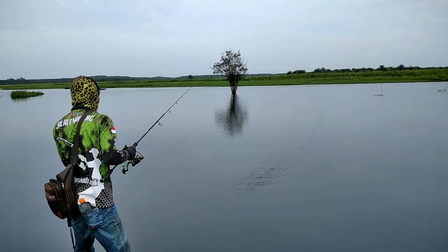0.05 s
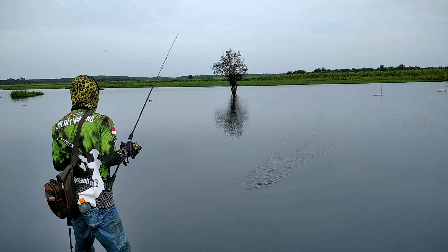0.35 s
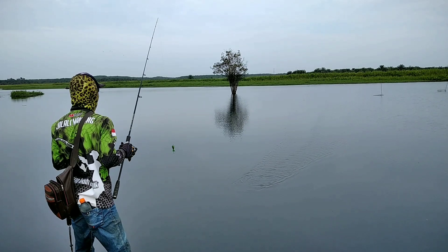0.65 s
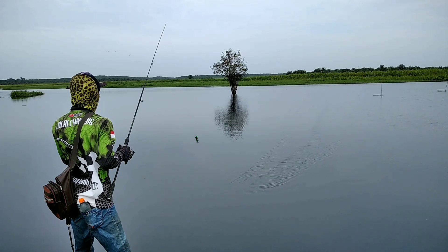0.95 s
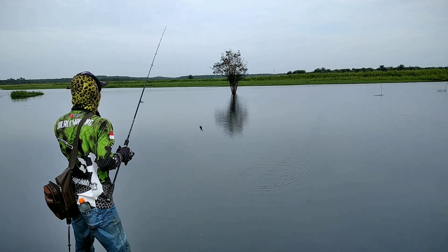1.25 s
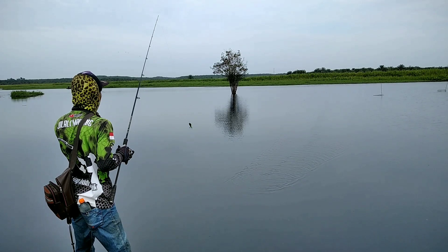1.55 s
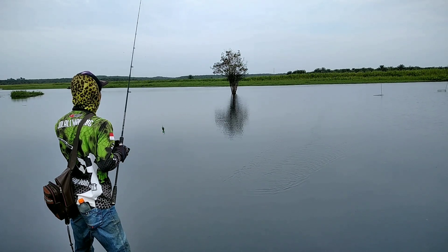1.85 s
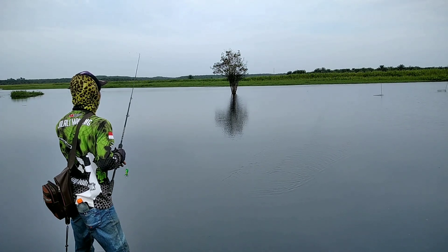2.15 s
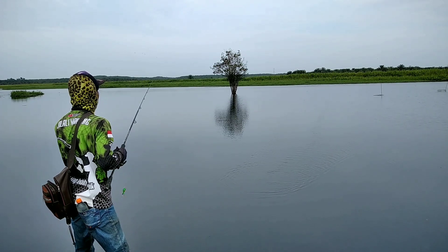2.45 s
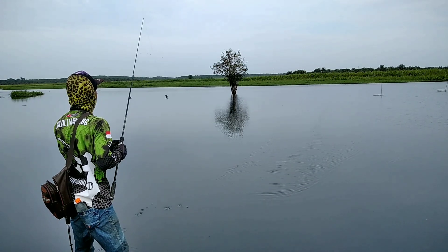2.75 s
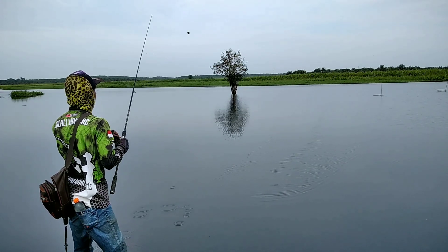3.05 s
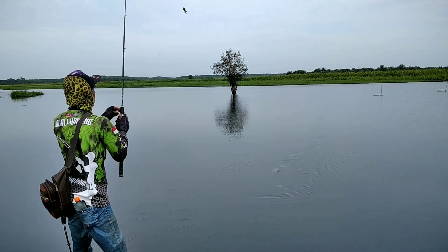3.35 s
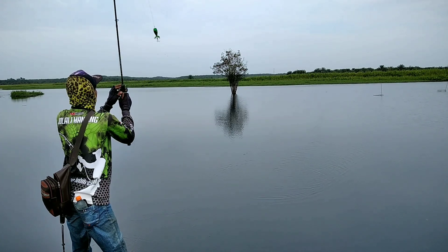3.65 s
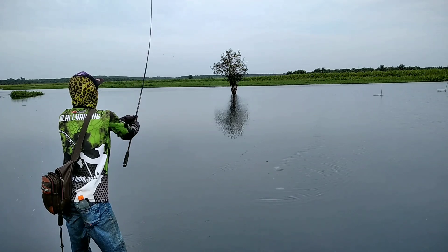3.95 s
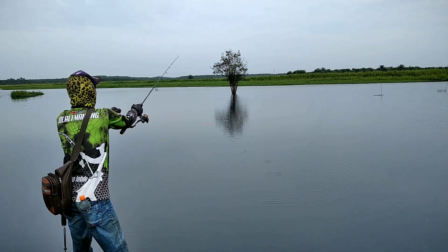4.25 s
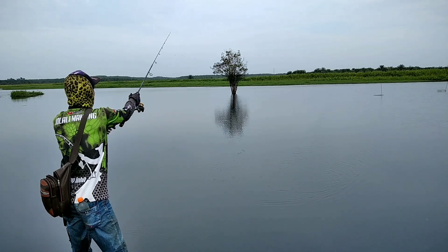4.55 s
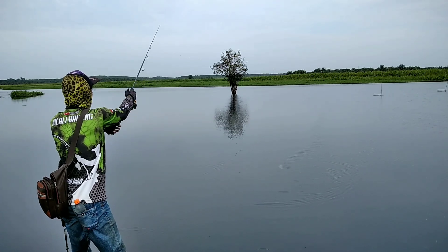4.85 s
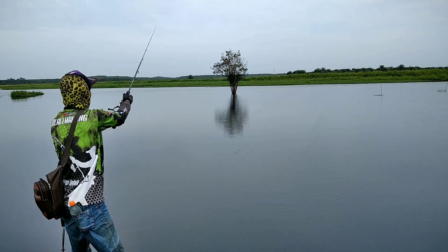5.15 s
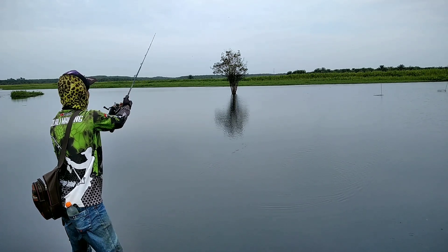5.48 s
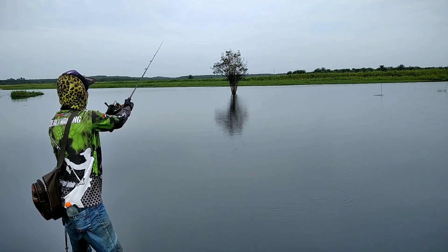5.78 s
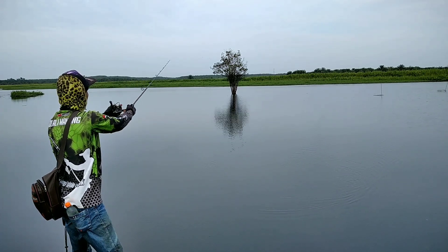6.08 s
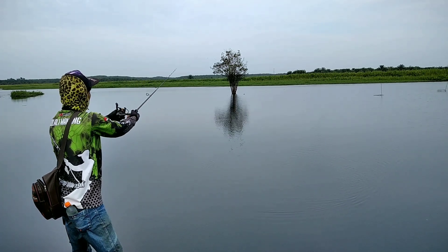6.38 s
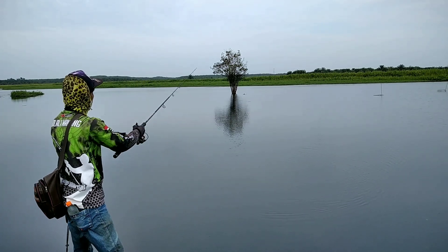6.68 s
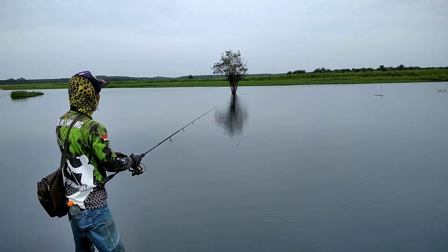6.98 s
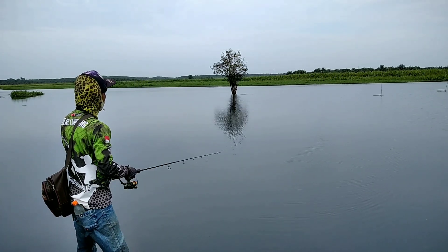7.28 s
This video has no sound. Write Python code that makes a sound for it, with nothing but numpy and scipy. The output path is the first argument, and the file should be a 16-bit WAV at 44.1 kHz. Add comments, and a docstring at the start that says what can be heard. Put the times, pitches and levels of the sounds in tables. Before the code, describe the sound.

A dense, high-pitched katydid buzz runs throughout on an open lake bank, the nearest insects to the right. Beneath it, a distant boat engine putters in a faint, low rumble on the left, swelling slightly at the end. From about 0.4 seconds a nearby frog gives short, bright rattling croaks, four or five a second, pausing around 1.5 and 5.3 seconds; a farther frog answers. A small bird chips twice at the start, and a soft, distant trill comes at 3 seconds. At 4 seconds a fishing rod swishes sharply, with a few light taps of the lure, and line hisses and rattles off the spool, fading by 5 seconds. The bird chips two falling phrases around 5 and 6 seconds. Four faint, dry reel clicks fall between 6.5 and 7 seconds. A light breeze bumps the microphones near 1 and 2 seconds and from 6 onward.

```python
"""A chorus of katydids buzzes on the bank of a still lake, each scrape ringing their wings.
Two frogs rattle to the right, pulses striking their vocal sacs. A small bird chips a few falling
phrases; a distant caller trills once. An angler casts: the rod swishes, line hisses off the spool,
the lure taps, the reel clicks. A far boat engine putters in a low rumble, mostly to the left,
and a light breeze bumps the microphones."""
import sys
import numpy as np
from scipy import signal
from scipy.fft import rfft, irfft, next_fast_len
from scipy.io import wavfile
from scipy.ndimage import map_coordinates

SR = 44100
rng = np.random.default_rng(int(sys.argv[2]) if len(sys.argv) > 2 else 0)


def store_pcm(level_fs):
    """Save levels as 16-bit WAV."""
    pcm = np.round(np.clip(level_fs, -1, 1) * 32767).astype(np.int16)
    wavfile.write(sys.argv[1], SR, np.atleast_2d(pcm).T)


N = 322812

# Swell of the katydid chorus. Each row: time in seconds, level in dB.
CHORUS_SWELL = [(0, -41), (1.8, -41.5), (3.2, -40), (5.3, -39.5), (7.32, -41.5)]
# Massed wings. Each row: frequency in Hz, relative density in dB.
WING_SPECTRUM = [(5500, -32.5), (6500, -27), (7200, -14), (7550, -15.5), (8200, -1), (8750, 6), (9100, 5),
                 (9500, -5), (9950, -12), (10300, -23), (10800, -68), (11500, -92)]
# Near katydids. Each row: stroke rate in Hz, its drift as a share, pitch in Hz, width in Hz,
# relative level in dB, L-R in dB, left lag in ms, throb rate in Hz, throb depth in dB.
NEAR_KATYDIDS = [(172.5, .004, 8050, 420, -12, -11, .311, 3, .5),
                 (176, .015, 8370, 380, -10, -13, .309, 5, 1), (115, .03, 8950, 360, -12.5, -7, .19, 7, 7),
                 (122, .045, 8780, 380, -9, -12, .307, 13, 1.2)]
# Near frog. Each row: start in seconds, pulse rate in Hz, pulse count, throat and sac in relative dB.
NEAR_FROG_CALLS = [(.4258, 96.7, 10, -64, -52.5), (.647, 97, 11, -59, -50), (.88, 91, 9, -59.5, -60),
                   (1.0671, 93.4, 10, -57.5, -47.3), (1.2746, 94.8, 10, -58, -47.3),
                   (2.16, 91, 8, -62, -66), (2.3527, 93.9, 11, -59.5, -46.5), (2.5839, 96.1, 8, -58.5, -46),
                   (2.7735, 95.6, 9, -63, -47), (3.005, 90, 9, -59.5, -62), (3.1797, 94.8, 10, -60, -45.3),
                   (3.3929, 95.6, 9, -58, -45.3), (3.602, 91, 9, -58, -60), (3.8131, 94.7, 10, -57, -45.7),
                   (4.03, 95, 10, -59, -53), (4.2522, 94.6, 10, -60, -43.7),
                   (4.4691, 94.8, 9, -56.5, -45.5), (4.675, 91, 9, -59.5, -61),
                   (4.8364, 95.7, 10, -57, -44.3), (5.085, 91, 8, -60, -61), (5.865, 91, 8, -60, -61),
                   (6.0245, 95.5, 11, -57.5, -45), (6.2361, 95.9, 10, -58.5, -44.7),
                   (6.4355, 95, 9, -59, -44.5), (6.655, 91, 9, -59.5, -62), (6.8179, 95, 10, -56.5, -44.5),
                   (7.0273, 94.9, 9, -58.5, -45.3), (7.25, 91, 9, -59, -62)]
# Far frog. Each row: start in seconds, relative level in dB.
FAR_FROG_CALLS = [(0.599, -66), (0.84, -59.5), (2.148, -63.5), (2.649, -65), (2.991, -60), (3.571, -60),
                  (4.67, -58.5), (4.89, -61), (5.071, -57.5), (5.631, -65.5), (5.85, -56.5), (6.079, -58.5),
                  (6.279, -60), (6.66, -58), (6.901, -60), (7.24, -58.5)]
# Vocal sac. Each row: ratio to sac pitch, gain in dB, rise in seconds, peak after the pulse in seconds.
SAC_MODES = [(.61, -20, .0009, 0), (.85, -20, .0016, -.001), (.995, -1.5, .0019, -.0002),
             (1.24, -22, .002, .0005), (1.495, -10.8, .0008, .0002)]
# Double knock of the throat. Columns as in SAC_MODES.
THROAT_MODES = [(.455, -1.8, .0018, -.0035), (.468, -1.2, .0018, -.0015)]
# Scatter from grass and shore. Each row: frequency in Hz, t60 in seconds.
BANK_DECAY = [(500, 0.11), (1300, 0.1), (3000, 0.089), (9000, 0.028)]
# Strength of the bank's return. Each row: frequency in Hz, gain in dB.
BANK_RESPONSE = [(900, -11), (1350, 1), (2000, 18), (2800, 0.5), (3600, -3), (4400, 13), (6000, -12)]
# Bird notes. Each row: start and length in seconds, top pitch in Hz, its place from 0 to 1, level in dB.
BIRD_NOTES = [(0.053, .037, 3940, .4, -55), (0.162, .035, 3720, 0.55, -57), (3.968, .02, 4800, .5, -56),
              (5.061, .044, 4880, .5, -51.5), (5.152, .044, 4760, .5, -51.5), (5.255, .035, 4350, .5, -55),
              (5.811, .03, 6080, 1, -52), (5.911, .022, 6150, 1, -53), (6.003, .025, 5430, .5, -53),
              (6.098, .022, 5200, .55, -58)]
# Rod swish, line hiss, line slapping and rattling in the rod rings, reel click.
# Each row: frequency in Hz, relative density in dB.
SWISH_SPECTRUM = [(150, -41), (350, -6), (900, 2.5), (2200, 2), (3900, 1), (4700, -1), (5400, -5.5),
                  (8000, -2.5), (14000, -27)]
LINE_SPECTRUM = [(800, -13.5), (3000, -21), (6000, -19), (8500, -10), (10500, 3), (14300, -1.5)]
SLAP_SPECTRUM = [(1200, -16), (3300, -1.5), (6000, -1.5), (12000, -11)]
RATTLE_SPECTRUM = [(500, -19), (1400, -12), (2800, -6), (3500, 0), (4600, 1), (5500, -10), (6600, -6),
                   (8000, 3), (14000, -4.5)]
CLICK_SPECTRUM = [(600, -8), (1500, -2), (3800, 2), (6000, -7), (13000, -35)]
# Lure and line on the rod. Each row: start in seconds, pitch in Hz, relative level in dB, t60 in seconds.
ROD_TAPS = [(.857, 507, -40.5, 0.033), (2.459, 900, -44, .025), (3.999, 2100, -34, .014),
            (4.046, 628, -33, 0.037), (4.055, 385, -33, 0.037), (4.117, 790, -29.5, 0.025),
            (4.358, 810, -37, 0.024)]
# Reel clicks. Each row: start in seconds, level in dB.
REEL_CLICKS = [(6.576, -52.5), (6.765, -52), (6.783, -54), (6.982, -55)]
# Boat engine. Each row: time in seconds, firing rate in Hz, relative level in dB.
ENGINE_RUN = [(0, 20.75, -58.5), (2.4, 20.7, -58), (5, 20.7, -61.5), (7.32, 21.8, -53)]
# Engine hum. Each row: frequency in Hz, relative harmonic level in dB.
HUM_SPECTRUM = [(41, -22), (83, 0), (125, -9), (207, -1), (250, -9), (415, -10), (500, -9), (580, -20)]
# Air bumps on the microphones. Each row: peak time in seconds, level in dB, L-R in dB.
AIR_BUMPS = [(0.862, -55, 2), (2.1, -50, -9), (2.222, -51.5, -16.5), (6.12, -54, 11)]
# Exhaust, air bump, far rumble, dull rush, open air. Each row: frequency in Hz, relative density in dB.
EXHAUST_SPECTRUM = [(35, -38), (60, 9.5), (85, 8.5), (130, -0.5), (200, 2.5), (300, 5), (345, -6.5),
                    (450, -15.5), (800, -25), (1500, -69.5)]
BUMP_SPECTRUM = [(30, -35.5), (60, -4.5), (85, -2), (140, -5), (250, -23.5), (600, -40), (1200, -76)]
RUMBLE_SPECTRUM = [(13, -68), (22, -50), (56, -4), (80, 4), (289, -8), (349, -14), (700, -33), (910, -39.5),
                   (1540, -120)]
WASH_SPECTRUM = [(200, -14.5), (330, -3), (450, -0.5), (650, -7), (900, -8.5), (1400, -48)]
AIR_SPECTRUM = [(200, -17.5), (500, 9.5), (1000, 5.5), (2000, 4.5), (4500, 1.5), (5500, -12),
                (10500, -42.5), (11800, -26), (13600, 3), (14400, -15)]


def katydids(mass_db=1.03, near_db=2.0, flutter_db=1.0):
    """Far singers merge into one band; each near one rings its wings once a stroke."""
    level_db, = curves(CHORUS_SWELL)
    out = amp(mass_db + flutter_db * wobble(16)) * rush(WING_SPECTRUM, alike=.066) * pan(-.27)
    for stroke_hz, drift, pitch_hz, width_hz, db, pan_db, lag_ms, throb_hz, depth_db in NEAR_KATYDIDS:
        scrape = np.exp(np.cos(cycles(stroke_hz, drift))) * rng.standard_normal(N)
        ring = filtered(scrape, lambda hz: 1 / (1 + 1j * (hz - pitch_hz) / width_hz) ** 4)
        throb_db = depth_db * np.cos(cycles(throb_hz, drift=.056)) + .17 * wobble(.41)
        song = unit(ring * amp(throb_db))
        out += amp(near_db + db) * placed(song, lag_ms, pan_db)
    return amp(level_db) * out


def croaks(calls, modes, sac_hz, jitter, cold_flat=.085, warm_up_s=1.1, attack_s=.02, sag_db_per_s=60):
    """Pulse trains strike the modes. The frog starts its bout flat and warms up to pitch."""
    out, t = np.zeros(N), np.arange(SR // 100) / SR
    for start_s, pulse_hz, pulses, db in calls:
        call_hz = sac_hz * (1 - cold_flat * np.exp(-start_s / warm_up_s))
        for offset_s in np.arange(pulses) / pulse_hz:
            onset = 1 - np.exp(-(offset_s + 1 / pulse_hz) / attack_s)
            force = onset * amp(db - sag_db_per_s * offset_s + rng.normal(0, 1))
            pitch_hz = call_hz * (1 + jitter * rng.standard_normal())
            pulse_s = start_s + offset_s + rng.normal(0, .0002)
            for ratio, mode_db, rise_s, peak_s in modes:
                shape = (t / rise_s * np.exp(1 - t / rise_s)) ** 3
                ring = shape * np.sin(2 * np.pi * (ratio * pitch_hz * t + rng.random()))
                add(out, pulse_s + peak_s - rise_s, force * amp(mode_db) * ring)
    return out


def frogs(near_db=13.4, far_db=13.5, near_wet_db=-12, far_wet_db=-5, far_pulse_hz=93, far_pulses=10):
    """The near frog's low throat knocks lead its bright sac by a pulse. A far, wetter frog answers."""
    throat_calls = [(s - 1 / hz, hz, pulses + 1, db) for s, hz, pulses, db, _ in NEAR_FROG_CALLS]
    sac_calls = [(s, hz, pulses, db) for s, hz, pulses, _, db in NEAR_FROG_CALLS]
    far_calls = [(s, far_pulse_hz, far_pulses, db) for s, db in FAR_FROG_CALLS]
    throat = croaks(throat_calls, THROAT_MODES, sac_hz=2835, jitter=.02)
    sac = croaks(sac_calls, SAC_MODES, sac_hz=2835, jitter=.01)
    near = amp(near_db) * (throat + sac)
    far = amp(far_db) * croaks(far_calls, SAC_MODES, sac_hz=2850, jitter=.022)
    direct = placed(near, lag_ms=.482, pan_db=-1.2) + placed(far, lag_ms=.41, pan_db=-1.2)
    tail = bank_scatter(amp(near_wet_db) * near + amp(far_wet_db) * far)
    return direct + filtered(tail, lambda hz: amp(along(BANK_RESPONSE, hz)))


def bird(arch=180, rasp_db=3, rasp_share=.013, wet_db=-10):
    """Short, raspy chips arch up and over in pitch; the highest break off at the top."""
    out, flutter, waver = np.zeros(N), wobble(600), wobble(700)
    for start_s, length_s, top_hz, crest, db in BIRD_NOTES:
        t = np.arange(round(length_s * SR)) / SR
        span = round(start_s * SR) + np.arange(len(t))
        pitch_hz = top_hz * (1 - arch * abs(t - crest * length_s) ** 1.8 + rasp_share * waver[span])
        gain = amp(db + rasp_db * flutter[span]) * np.sin(np.pi * t / length_s) ** .5
        add(out, start_s, gain * np.sin(2 * np.pi * np.cumsum(pitch_hz) / SR))
    return placed(out, lag_ms=.404, pan_db=-4) + amp(wet_db) * bank_scatter(out)


def trill(start_s=3.052, pips=5, rate_hz=27, pip_s=.02, pitch_hz=2400, db=-54, wet_db=-10):
    """A distant caller gives one run of soft, even pips."""
    out, t = np.zeros(N), np.arange(round(pip_s * SR)) / SR
    pip = amp(db) * np.sin(np.pi * t / pip_s) * np.sin(2 * np.pi * pitch_hz * t)
    for k in range(pips):
        add(out, start_s + k / rate_hz, pip)
    return placed(out, lag_ms=.22, pan_db=0) + amp(wet_db) * bank_scatter(out)


def rod_swish(swing_s=4.052, whip_s=4.118, swing_db=-36, whip_db=-40, wake_db=-47):
    """The rod cuts the air on the swing and the whip back; the lure trails a fading rush."""
    swing = amp(swing_db) * envelope(swing_s, attack_s=.027, release_s=.042, hold_s=.004)
    whip = amp(whip_db) * envelope(whip_s, attack_s=.022, release_s=.026, hold_s=.008)
    wake = amp(wake_db) * envelope(whip_s, attack_s=.037, release_s=.22, hold_s=.12, sag_db_per_s=17)
    gain = np.sqrt(swing ** 2 + whip ** 2 + wake ** 2)
    return gain * amp(1.66 * wobble(90)) * rush(SWISH_SPECTRUM, alike=.11)


def fishing_line(start_s=4.05, flight_s=.96, braking=2.3, coil_hz=100, slowing_s=4.7,
                 hiss_db=-42, slap_db=-40, rattle_db=-47.5):
    """Coils burst off the spool, slap the rod rings and rattle through, easing as the lure slows."""
    flown_s = np.maximum(np.arange(N) / SR - start_s, 0)
    speed = np.maximum(1 - (flown_s / flight_s) ** braking, 0)
    flight = speed * envelope(start_s, attack_s=.03, release_s=.05, hold_s=flight_s, sag_db_per_s=4)
    burst = amp(-1) * envelope(peak_s=4.07, attack_s=.03, release_s=.022)
    slap_gain = amp(slap_db) * envelope(peak_s=4.092, attack_s=.035, release_s=.04)
    slap = slap_gain * rush(SLAP_SPECTRUM, alike=.1) * pan(-4)
    coil = np.cos(cycles(coil_hz * np.exp(-flown_s / slowing_s), drift=.023))
    flutter = unit(amp(.5 * coil + 1.1 * wobble(28) + 1.2 * wobble(250)))
    hiss = amp(hiss_db) * flutter * rush(LINE_SPECTRUM, alike=0) * pan(5)
    rasp = unit(amp(2.5 * coil + 1.5 * wobble(70) + 3.5 * wobble(400)))
    rattle = flight * amp(rattle_db) * rush(RATTLE_SPECTRUM, alike=.1)
    return (flight + burst) * hiss + rasp * (slap + rattle)


def rod_taps(attack_s=.0016):
    """Lure and line tap the rod; each tap rings briefly at one pitch."""
    out, t = np.zeros(N), np.arange(SR // 8) / SR
    for start_s, hz, db, t60_s in ROD_TAPS:
        gain = amp(db - 60 * t / t60_s) * (1 - np.exp(-t / attack_s))
        add(out, start_s, gain * np.sin(2 * np.pi * hz * t))
    return out * pan(4)


def reel(t60_s=.025):
    """The angler works the reel: short, dry clicks."""
    strikes, t = np.zeros(N), np.arange(SR // 10) / SR
    for start_s, db in REEL_CLICKS:
        add(strikes, start_s, amp(db - 60 * t / t60_s))
    return strikes * rush(CLICK_SPECTRUM, alike=0) * pan(-3)


def boat(exhaust_gain_db=-1, hum_db=-61.5, fade_db_per_s=1.2, harmonics=14):
    """A far one-cylinder engine: a dull, smeared puff per firing, over a receding even-harmonic hum."""
    firing_hz, level_db = curves(ENGINE_RUN)
    phase = cycles(firing_hz, drift=.00295)
    puffs = np.exp(1.57 * np.cos(phase)) * rush([(100, 0)], alike=.43)  # white noise, pulsed
    dull_puffs = unit(filtered(puffs, lambda hz: amp(along(EXHAUST_SPECTRUM, hz))))
    exhaust = amp(level_db + exhaust_gain_db) * dull_puffs
    tones = np.zeros(N)
    for order in range(2, 2 * harmonics + 1, 2):
        tone_db = along(HUM_SPECTRUM, order * firing_hz[0]) + 1.8 * wobble(2.3)
        tones += amp(tone_db) * np.sin(order * phase + 2 * np.pi * rng.random())
    hum = amp(hum_db - fade_db_per_s * np.arange(N) / SR) * unit(tones)
    return (exhaust + hum) * pan(13.5)


def breeze(half_bump_s=.045, arrival_s=6.02, rise_s=.23, steady_db=-58, lumpy_db=3):
    """Air bumps the microphones a few times, then keeps nudging mainly the left one."""
    t = np.arange(N) / SR
    bumps = sum(amp(db) * np.exp(-((t - peak_s) / half_bump_s) ** 2) * pan(pan_db)
                for peak_s, db, pan_db in AIR_BUMPS)
    onset = np.exp(np.minimum(t - arrival_s, 0) / rise_s)
    steady = amp(steady_db + lumpy_db * wobble(11)) * onset * pan(9.4)
    return (bumps + steady) * rush(BUMP_SPECTRUM, alike=.27)


def background(rumble_db=-53.5, swell_share=.099, wash_db=-60.5, fade_db_per_s=1.23, air_db=-57):
    """Far rumble on the left that swells with the boat, a fading dull rush, and open-country hiss."""
    _, engine_db = curves(ENGINE_RUN)
    swell_db = swell_share * (engine_db - engine_db.mean()) + .54 * wobble(15)
    rumble = amp(rumble_db + swell_db) * rush(RUMBLE_SPECTRUM, alike=.55) * pan(12.45)
    wash = amp(wash_db - fade_db_per_s * np.arange(N) / SR) * rush(WASH_SPECTRUM, alike=.36) * pan(1.7)
    return rumble + wash + amp(air_db) * rush(AIR_SPECTRUM, alike=-.073)


def bank_scatter(x, delay_s=.004):
    """Grass and shore return a short diffuse tail, new for each side and each quarter second."""
    out, block = np.zeros((2, N)), SR // 4
    for start in range(0, N, block):
        hz, t, noise = signal.stft(rng.standard_normal((2, block)), SR, nperseg=256)
        decay = amp(-60 * t / along(BANK_DECAY, hz)[:, None])
        _, tails = signal.istft(noise * decay, SR, nperseg=256)
        for side, tail in zip(out, tails):
            echo = signal.fftconvolve(x[start:start + block], tail / np.linalg.norm(tail))
            add(side, start / SR + delay_s, echo)
    return out


def amp(db):
    return 10 ** (np.asarray(db) / 20)


def unit(x):
    """Scale to rms 1."""
    return x / np.sqrt(np.mean(x ** 2) + 1e-20)


def along(points, hz):
    """Interpolate (Hz, value) points on a log axis."""
    knots_hz, values = np.transpose(points)
    return np.interp(np.log(hz + 1), np.log(knots_hz + 1), values)


def curves(rows):
    """One value per sample for each column after the time."""
    times_s, *columns = np.transpose(rows)
    return [np.interp(np.arange(N) / SR, times_s, column) for column in columns]


def wobble(rate_hz):
    """A smooth random curve with knots at rate_hz."""
    knots = rng.standard_normal(int(N * rate_hz / SR) + 4)
    return map_coordinates(knots, [np.arange(N) * rate_hz / SR])


def cycles(rate_hz, drift):
    """Phase in radians of a rhythm whose rate drifts by a share."""
    return 2 * np.pi * (rng.random() + np.cumsum(rate_hz * (1 + drift * wobble(3))) / SR)


def envelope(peak_s, attack_s, release_s, hold_s=0, sag_db_per_s=0):
    """Rise to 1, sag while held, die away; attack and release are time constants."""
    t = np.arange(N) / SR - peak_s
    sag = amp(-sag_db_per_s * np.clip(t, 0, hold_s))
    return sag * np.exp(np.minimum(t, 0) / attack_s - np.maximum(t - hold_s, 0) / release_s)


def filtered(x, response):
    """Apply a complex response, a function of Hz."""
    size = next_fast_len(N + SR // 2)
    return irfft(rfft(x, size) * response(np.fft.rfftfreq(size, 1 / SR)), size)[..., :N]


def rush(spectrum, alike):
    """Coloured stereo noise of rms 1; alike is the left-right correlation."""
    angle = np.arccos(np.clip(alike, -1, 1)) / 2
    noise = filtered(rng.standard_normal((2, N)), lambda hz: amp(along(spectrum, hz)))
    mid, side = noise * [[np.cos(angle)], [np.sin(angle)]]
    return unit(np.array([mid + side, mid - side]))


def add(track, start_s, sound):
    part = track[max(round(start_s * SR), 0):][:len(sound)]
    part += sound[:len(part)]


def pan(db):
    """Stereo gains for an L-R level difference."""
    return amp([[db / 2], [-db / 2]])


def placed(x, lag_ms, pan_db):
    """A source to the right reaches the left microphone later."""
    left = filtered(x, lambda hz: np.exp(-2j * np.pi * hz * lag_ms / 1000))
    return pan(pan_db) * np.array([left, x])


def scene():
    animals = katydids() + frogs() + trill() + bird()
    angler = rod_swish() + fishing_line() + rod_taps() + reel()
    return animals + angler + boat() + breeze() + background()


def record(dry, top_hz=14280):
    """Brick-wall band limit."""
    return filtered(dry, lambda hz: hz < top_hz)


dry = scene()
out = record(dry)
store_pcm(out)
```